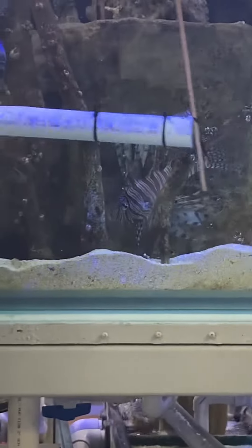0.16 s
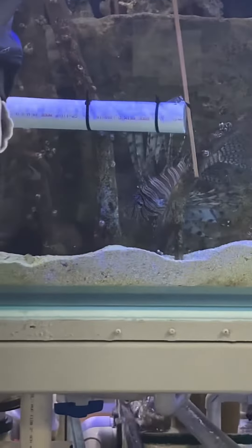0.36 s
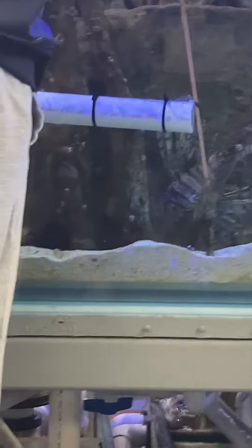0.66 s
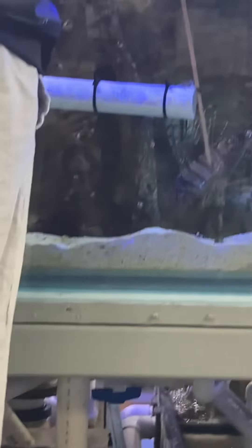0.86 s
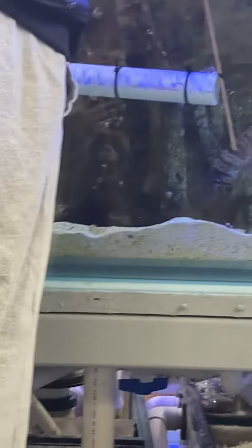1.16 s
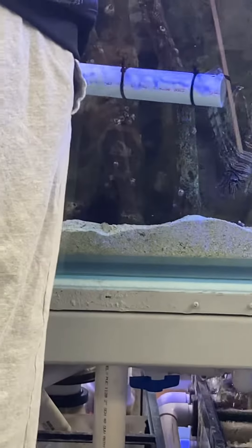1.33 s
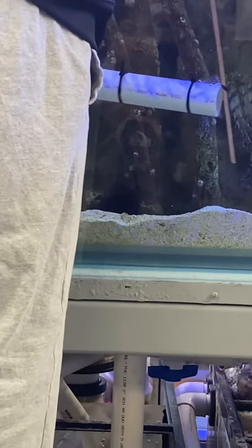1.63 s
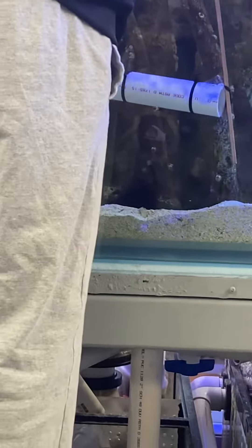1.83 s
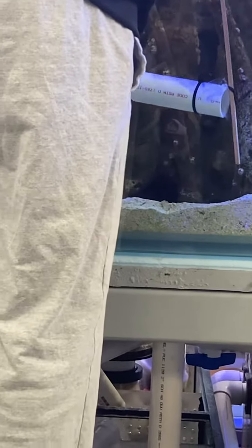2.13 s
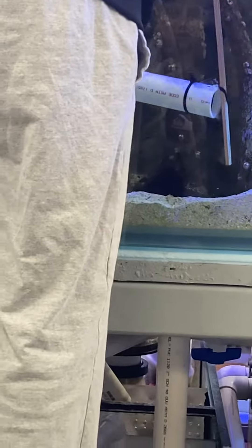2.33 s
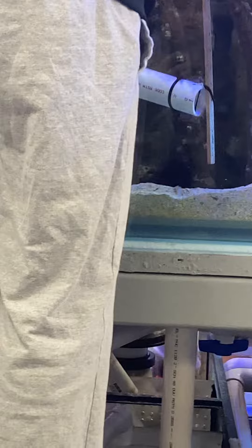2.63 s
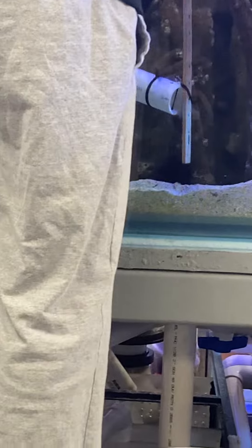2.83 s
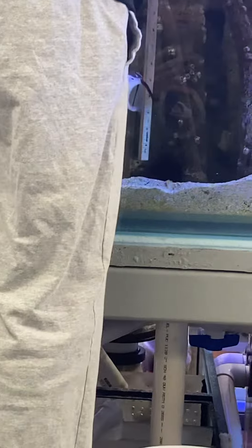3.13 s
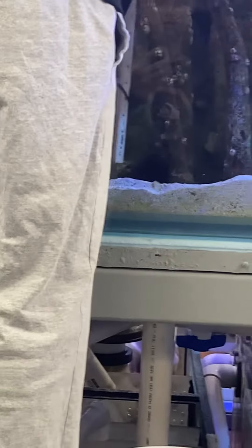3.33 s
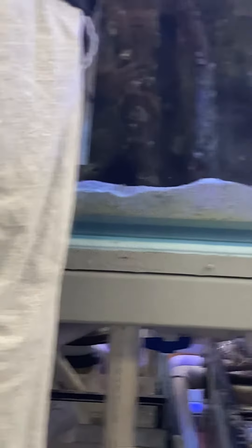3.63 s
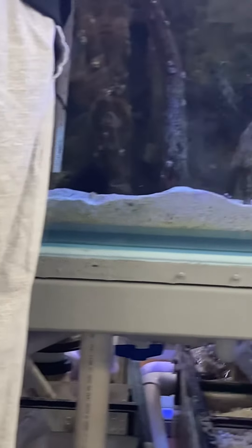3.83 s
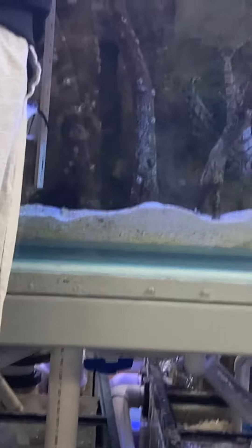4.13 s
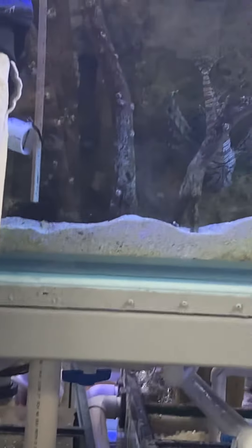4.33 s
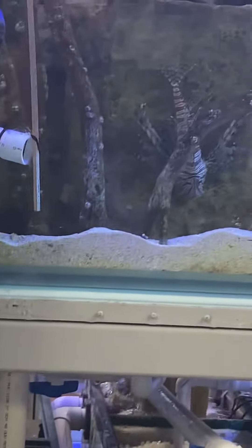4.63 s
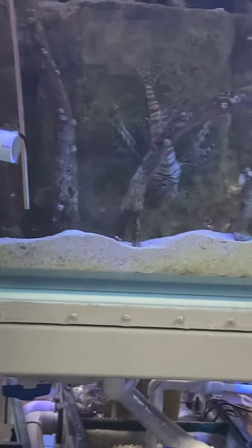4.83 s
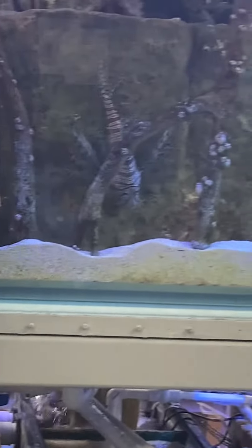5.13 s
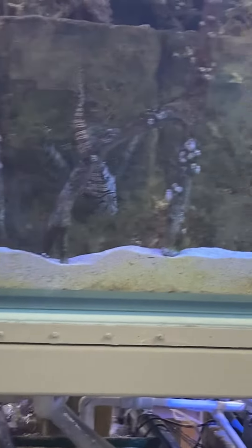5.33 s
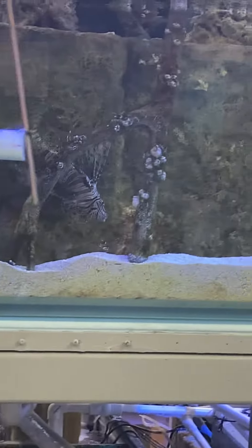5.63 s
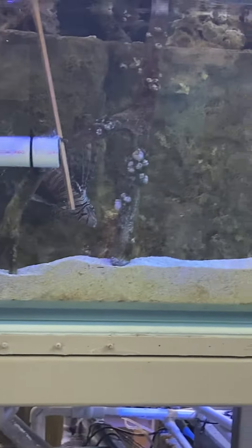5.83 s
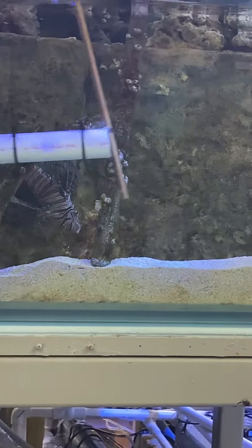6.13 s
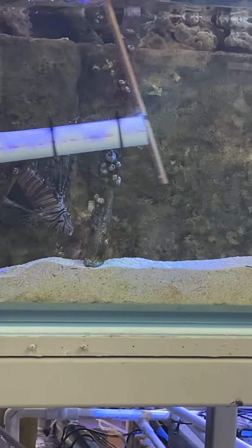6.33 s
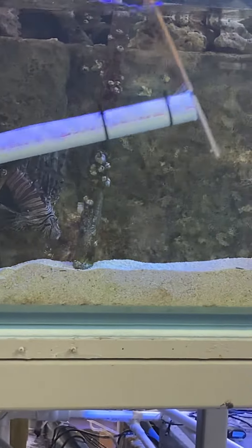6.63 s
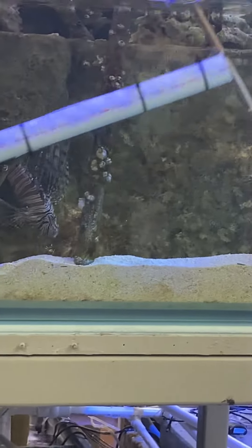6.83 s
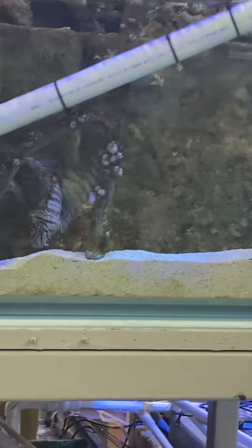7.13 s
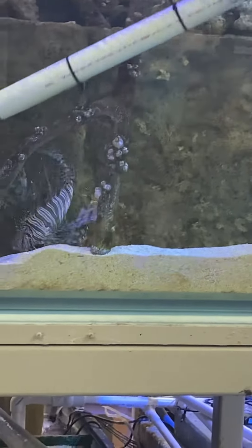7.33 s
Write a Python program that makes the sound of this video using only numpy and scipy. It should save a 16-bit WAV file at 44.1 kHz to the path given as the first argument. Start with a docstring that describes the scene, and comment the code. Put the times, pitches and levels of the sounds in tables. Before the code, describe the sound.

Heard from in front of a big tank indoors, a steady low hum leans slightly right, with pipe rumble, wide watery hiss and a faint, smeared burble. After a brief muffled start everything stays continuous. A narrow high motor whine wavers, changes as the stereo microphone pair turns right a little past four seconds, fades near six, then returns.

```python
"""A deep, hushed mains hum under fine treble hiss is heard first; it opens to full level within a quarter second.
Aquarium pumps run steadily under a large tank indoors, heard by a microphone pair in front of the glass.
Motors sound as wavering sines, one of them a whine; water rumbles and hisses as filtered patchy noise.
Decaying sines of bubbles blur into a soft burble. The pair turns once, shifting levels and colour."""
import sys
import numpy as np
from scipy import signal
from scipy.fft import rfft, irfft, next_fast_len
from scipy.io import wavfile
from scipy.ndimage import uniform_filter1d, map_coordinates

SR = 44100
rng = np.random.default_rng(int(sys.argv[2]) if len(sys.argv) > 2 else 0)


def put_to_file(sound):
    """Save the sound as 16-bit audio at rate SR, in the file named by the first command-line argument."""
    columns = np.atleast_2d(sound).T  # one column per channel
    safe = np.clip(columns, -1, 1)
    whole_steps = np.round(safe * 32767)
    wavfile.write(sys.argv[1], SR, whole_steps.astype(np.int16))


N = 328986  # length in samples

MAINS_HZ = 60.015
WAVER, WAVER_PER_S = 0.17, 8  # share of a motor tone that wanders, and random knots per second
TURN_S, TURN_LENGTH_S = 4.23, 0.59  # middle and length of the turn to the right, into other standing waves


def amp(db):
    """Decibel law: level in dB to amplitude gain."""
    return 10 ** (np.asarray(db) / 20)


def unit(x):
    """Normalisation: x scaled to rms 1."""
    return x / np.sqrt(np.mean(np.abs(x) ** 2) + 1e-20)


def along(points, hz):
    """Spectral interpolation: (f, value) points joined on a logarithmic frequency axis."""
    f, value = np.transpose(points)
    return np.interp(np.log(hz + 1), np.log(f + 1), value)


def clock():
    """Sampling: the time of each sample in seconds."""
    return np.arange(N) / SR


def wobble(rate):
    """Slow random modulation: a smooth curve through rate random knots a second."""
    coarse = np.linspace(0, N / SR, 4096)
    knots = rng.standard_normal(2048)
    curve = map_coordinates(knots, [coarse * rate], mode="wrap")
    return np.interp(clock(), coarse, curve)


def filtered(x, response):
    """Linear filtering: the spectrum of x times a complex response of frequency."""
    size = next_fast_len(N + SR // 2)
    hz = np.fft.rfftfreq(size, 1 / SR)
    return irfft(rfft(x, size) * response(hz), size)[..., :N]


def tone(hz, lead, waver, rate, beat=1):
    """Interference: reflections add a part of wandering strength and phase to a stereo sine of rms 1."""
    phase = 2 * np.pi * (hz * clock() + rng.random())
    reflected = waver * (wobble(rate) + 1j * wobble(rate))
    z = unit(beat * (1 + reflected) * np.exp(1j * phase))
    left = (z * np.exp(0.5j * lead)).real  # lead: radians by which the left is ahead
    right = (z * np.exp(-0.5j * lead)).real
    return np.sqrt(2) * np.array([left, right])


def turn_share():
    """Crossfade: how far the pair has turned from its first direction to its second, 0 to 1."""
    return np.clip((clock() - TURN_S) / TURN_LENGTH_S + 0.5, 0, 1)


def turned(before_db, after_db):
    """Standing waves: a tone's gain moves between two levels as the pair turns."""
    return amp(before_db + turn_share() * (after_db - before_db))


# Depth of the random patches in the flow and hiss: f/Hz, rms depth/dB
GURGLE_DEPTH = [(100, 1.3), (400, 2.14), (1200, 2.5), (3500, 3), (7000, 2.0)]


def patchy_noise(channels):
    """Turbulence: white noise drifts in strength over small patches of time and frequency."""
    white = rng.standard_normal((channels, N))
    hz, _, z = signal.stft(white, SR, nperseg=1024)
    field = rng.standard_normal(z.shape[1:])
    field = uniform_filter1d(field, size=3, axis=0)  # frequency
    field = uniform_filter1d(field, size=6, axis=1)  # time
    gain = amp(along(GURGLE_DEPTH, hz)[:, None] * unit(field))
    gain = gain / np.sqrt(np.mean(gain ** 2, axis=1, keepdims=True))
    return signal.istft(z * gain, nperseg=1024)[1][:, :N]


def drone(level_db=-37, slip_hz=2.61, beat_depth=0.15, crest_s=0.34):
    """Magnetostriction and beating: iron flexes twice a mains cycle, against a tone lower by the slip rate."""
    # the motor lags the mains; crest_s is the time of one crest of the beat
    throb = 1 + beat_depth * np.exp(-2j * np.pi * slip_hz * (clock() - crest_s))
    return amp(level_db) * tone(2 * MAINS_HZ, lead=-0.09, waver=0.055, rate=12, beat=throb)


# Phase by which the hiss leads on the left: f/Hz, phase/rad
HISS_LEAD = [(2000, 2.4), (4000, 3.1), (5600, 3.14), (6100, 2.7), (8000, 0), (9000, -.1), (11200, -2.9),
             (12200, -3.3), (14500, -6.2)]
# Spectral density of the running water's hiss, relative: f/Hz, level/dB per Hz
HISS_COLOUR = [(800, -30), (2000, -5), (3000, -1.5), (4000, -1.5), (5000, -1), (5700, -1.2), (6600, .7),
               (7300, .6), (7900, -.6), (9000, -.6), (11000, -2.8), (13000, -7), (15500, -9.3)]


def hiss(level_db=-45.5, flutter_db=0.45, independent_db=-26):
    """Interchannel phase: one noise reaches both sides shifted; a little independent noise loosens it."""
    shift = lambda hz: np.exp(np.outer([0.5j, -0.5j], along(HISS_LEAD, hz)))
    direct = filtered(patchy_noise(channels=1), shift)
    independent = amp(independent_db) * rng.standard_normal((2, N))
    pair = filtered(direct + independent, lambda hz: amp(along(HISS_COLOUR, hz)))
    return amp(level_db + flutter_db * wobble(24)) * unit(pair)


# Magnetic buzz: multiple of the mains, level before turn/dB, level after turn/dB, left lead/rad
MAINS_HARMONICS = [(1, -52.2, -51.7, -.1), (4, -54.3, -52, 0), (5, -60, -62, .1), (6, -57, -54.7, -.2),
                   (8, -61, -64, -.4), (9, -66.5, -66.5, 0), (10, -66, -68, .5), (11, -68.5, -68.5, 0),
                   (12, -57.6, -53, .1), (13, -64, -73, 0), (14, -59.5, -66, .9), (16, -56.2, -58.6, .4),
                   (17, -68, -68, .5), (20, -71, -71, 0), (22, -70.5, -70.5, 0), (29, -65.2, -67, .6),
                   (33, -71, -66.5, -.5), (37, -65, -71, -1.7)]


def motors():
    """Harmonic series: a weaker magnetic buzz lies on other multiples of the mains."""
    return sum(
        turned(before_db, after_db) * tone(multiple * MAINS_HZ, lead, WAVER, WAVER_PER_S)
        for multiple, before_db, after_db, lead in MAINS_HARMONICS)


# Shaft throb and turning vanes: f/Hz, level before turn/dB, level after turn/dB, left lead/rad
ROTOR_TONES = [(29.3, -55, -55, 0), (58.5, -60, -60, 0), (72.3, -61, -61, 0), (237.3, -62, -62, 0),
               (702, -56.7, -56.5, .15), (1284, -68.6, -68, 1.3), (1404, -59.8, -53.8, -2),
               (2104, -64.5, -63.8, -1.9), (2808, -67.6, -71.7, -1.8), (8283, -71.8, -68.3, 0)]


def rotors():
    """Rotational sound: shafts and vanes give tones that are not tied to the mains."""
    return sum(
        turned(before_db, after_db) * tone(hz, lead, WAVER, WAVER_PER_S)
        for hz, before_db, after_db, lead in ROTOR_TONES)


# Correlation of the flow sound between the two microphones: f/Hz, correlation
LIKENESS = [(130, 0.9), (300, 1), (640, 0.34), (1400, 0.39), (2500, -0.02), (6000, -0.82)]


def room_lead(hz):
    """Spatial coherence: the angle whose cosine is the correlation of left and right."""
    return -np.arccos(np.clip(along(LIKENESS, hz), -1, 1))


# Spectral density of flow in the pipes, relative: f/Hz, level/dB per Hz
FLOW_COLOUR = [(20, -21), (30, -15), (39, -12), (48, -2), (75, 0.1), (130, 0), (160, -3), (220, -5.5),
               (320, -7.5), (440, -8.5), (550, -13.5), (700, -10), (950, -11), (1400, -12.5), (2000, -14.5),
               (2800, -18.5), (4500, -19.5), (5300, -71), (9000, -63), (15000, -75)]
# Faint ringing of the pipes and sump in the flow: f/Hz, width/Hz, lift/dB
PIPE_RESONANCES = [(142, 9.8, 0.5), (204, 17, 2), (253.5, 22, 4), (373, 30, 3.5), (479, 51, 2.5),
                   (619, 21, 6), (736, 29, 3.5), (873, 130, 2.5)]
# Change in the flow's colour once the pair has turned: f/Hz, change/dB
TURN_COLOUR = [(100, 0), (600, .2), (1300, 0.45), (2200, 0.2), (3300, -0.5), (6000, 1.5)]


def flow(level_db=-39.5, surge_db=0.5):
    """Resonance and diffuseness: pipes colour the rumble, alike in the bass and diffuse higher up."""
    def colour_db(hz):
        lift = sum(db / (1 + (2 * (hz - centre) / width) ** 2) for centre, width, db in PIPE_RESONANCES)
        return along(FLOW_COLOUR, hz) + lift

    def mid_side(hz):
        angle = room_lead(hz) / 2
        return amp(colour_db(hz)) * [np.cos(angle), np.sin(angle)]

    noise = patchy_noise(channels=2)
    recoloured = filtered(noise, lambda hz: amp(along(TURN_COLOUR, hz)))
    noise = noise + turn_share() * (recoloured - noise)
    mid, side = filtered(noise, mid_side)
    surge = amp(level_db + surge_db * wobble(4.62))
    return surge * unit(np.array([mid + side, mid - side]))


BUBBLES_PER_S = 260  # small bubbles bursting where the water returns
BUBBLE_HZ, BUBBLE_OCTAVES = 1893, 0.48  # typical starting pitch, and its spread in octaves
BUBBLE_CYCLES = 9.9  # starting-pitch cycles in which the ring decays by a factor e


def burble(level_db=-58, scatter_db=4, rise=0.168, room_t60=0.16):
    """Bubble resonance and reverberation: short rings rise in pitch and the room smears them."""
    count = int(BUBBLES_PER_S * N / SR)
    pitch, size = rng.standard_normal((count, 2)).T[:, :, None]
    start = rng.integers(N, size=(count, 1))
    age = np.arange(SR // 30)  # samples
    start_hz = BUBBLE_HZ * 2 ** (BUBBLE_OCTAVES * np.clip(pitch, -2, 2))
    cycles = start_hz * age / SR
    life = cycles / BUBBLE_CYCLES
    risen_cycles = cycles * (1 + rise * (1 - np.exp(-life / 2)))
    envelope = np.exp(-life) * (1 - np.exp(-cycles))
    strength = amp(scatter_db * np.clip(size, -2, 2))
    rings = strength * np.sin(2 * np.pi * risen_cycles) * envelope
    pops = np.bincount((start + age).ravel(), rings.ravel(), minlength=N)[:N]
    t = np.arange(SR // 4) / SR
    room = rng.standard_normal((2, len(t))) * np.exp(-np.log(1000) * t / room_t60)  # 60 dB decay
    return amp(level_db) * unit(signal.fftconvolve(pops[None], room, axes=1)[:, :N])


WHINE_HZ = 2632
# The whine as the pair moves through its standing waves: t/s, level/dB, left lag/rad, left minus right/dB
WHINE_PATH = [(0.19, -67, .6, -2), (0.24, -69, .7, 1), (0.31, -57.5, .8, -2), (0.47, -49.5, 1.35, -2),
              (0.6, -49.5, 1.7, 0), (0.72, -51, 2.05, 0), (1.05, -51.5, 2.6, 1), (1.4, -50, 2.34, 1),
              (1.8, -50.5, 2.14, 0), (2.5, -49.5, 2, 0), (3.65, -51, 2.1, 0), (3.9, -49.5, 1.94, 1),
              (4.2, -47.7, 1.75, 0), (4.36, -52.5, 1.1, -10), (4.58, -50, 2.4, -4.5),
              (5.05, -50, 2.56, 1.5), (5.5, -50.5, 2.4, 0), (5.9, -59, 3, 2), (6.1, -61.5, 3.1, 5),
              (6.55, -56, 2.2, 0), (7.05, -51.5, 2.2, -2)]


def whine(octave_db=-13, blur_db=-12):
    """Standing waves and sidebands: a thin motor note has a rough blur around it and a faint octave."""
    times, *columns = np.transpose(WHINE_PATH)
    level_db, lag, left_minus_right_db = (np.interp(clock(), times, column) for column in columns)
    note = tone(WHINE_HZ, lead=-lag, waver=0.1, rate=12)
    blur = unit(wobble(70)) * tone(WHINE_HZ, lead=-lag, waver=0.37, rate=40)
    octave = tone(2 * WHINE_HZ, lead=np.pi, waver=0.3, rate=7.4)
    sides = amp(np.outer([0.5, -0.5], left_minus_right_db))
    return amp(level_db) * (sides * (note + amp(blur_db) * blur) + amp(octave_db) * octave)


# Stereo balance, the pumps standing to the right: f/Hz, left minus right/dB
BALANCE = [(120, -4), (350, -2), (700, -1.8), (1400, -.9), (3000, 0)]


def scene():
    """Superposition: pumps and water add, and level difference leans the low sounds to the right."""
    mix = drone() + hiss() + motors() + rotors() + flow() + burble() + whine()

    def lean(hz):
        sides = amp(np.outer([0.5, -0.5], along(BALANCE, hz)))
        return sides / np.sqrt(np.mean(sides ** 2, axis=0))

    return filtered(mix, lean)


# Level of the first moment against the rest: f/Hz, change/dB
OPENING_HUSH = [(100, -9), (700, -5.5), (3300, -10), (7700, -12.5), (8200, 0.5)]
TOP_HZ = 15780  # upper band limit


def record(dry, opens_s=0.19, rise_s=0.024):
    """Spectral crossfade and band limit: all but the high treble starts hushed and soon opens up."""
    hushed = filtered(dry, lambda hz: amp(along(OPENING_HUSH, hz)))
    opened = np.clip((clock() - opens_s) / rise_s + 0.5, 0, 1)
    return filtered(hushed + opened * (dry - hushed), lambda hz: hz < TOP_HZ)


dry = scene()
out = record(dry)
put_to_file(out)
```